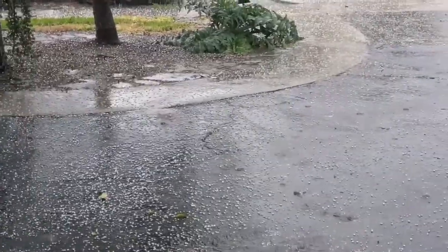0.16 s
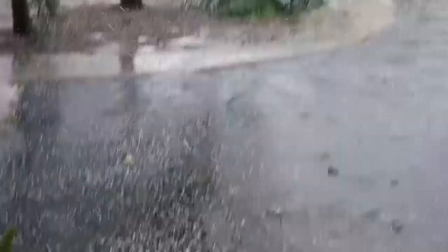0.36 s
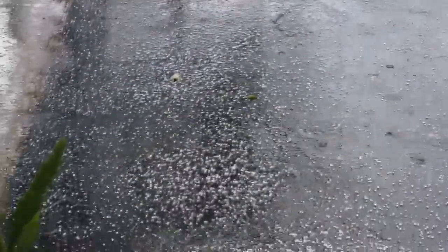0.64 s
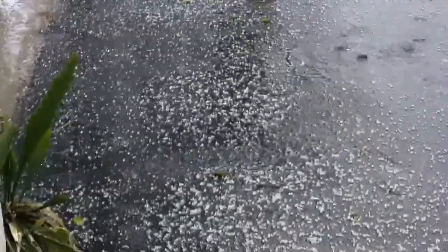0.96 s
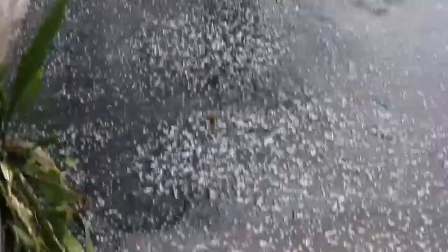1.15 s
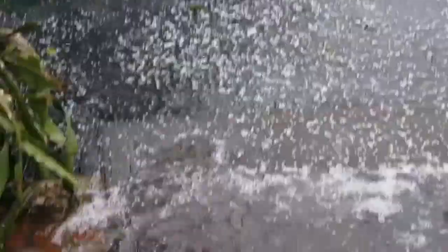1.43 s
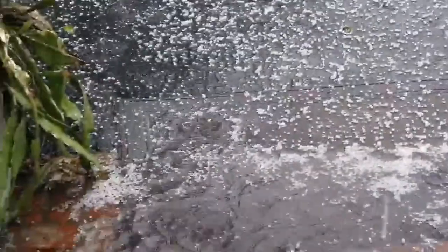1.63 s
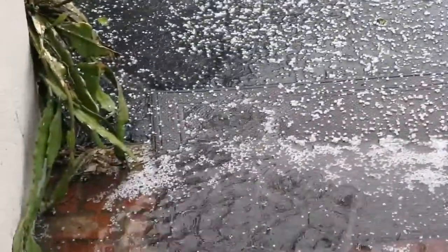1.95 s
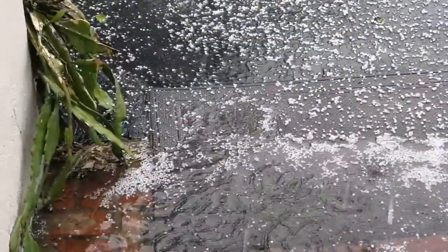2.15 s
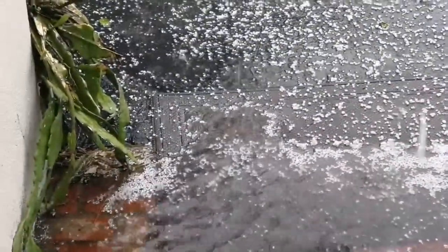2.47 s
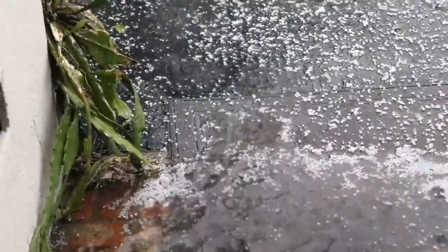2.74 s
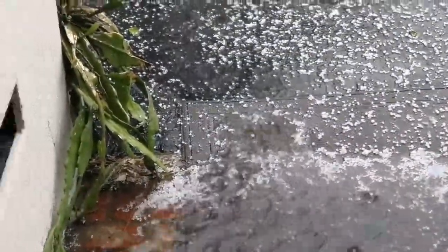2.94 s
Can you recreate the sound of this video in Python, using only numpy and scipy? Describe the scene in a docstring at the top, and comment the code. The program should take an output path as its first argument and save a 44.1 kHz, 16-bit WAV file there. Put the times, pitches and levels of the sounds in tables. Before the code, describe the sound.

Small hail with heavy rain on wet pavement, heard in stereo from a doorway: steady hiss, crisp nearby ticks, puddle plips and eave splashes; a low boom fades at the start, and one stone pings metal late.

```python
"""Hail and heavy rain on wet pavement

Small hail and heavy rain, heard in stereo from a doorway. Far drops fuse into a hiss of filtered noise;
near stones tick as short damped modes, sharp on the left and blurred by the wall on the right.
Water splashes from the eave as grainy noise bursts, and drops leave ringing bubbles in puddles.
One stone rings a piece of metal, and a low boom of damped sines dies away over a soft noise rumble."""
import sys
import numpy as np
from scipy import signal
from scipy.fft import rfft, irfft, next_fast_len
from scipy.io import wavfile
from scipy.ndimage import uniform_filter1d, map_coordinates

SR = 44100
rng = np.random.default_rng(int(sys.argv[2]) if len(sys.argv) > 2 else 0)


def pcm_store(signal):
    """Save signal as 16-bit PCM."""
    levels = np.round(np.clip(np.atleast_2d(signal), -1, 1) * 32767)
    wavfile.write(sys.argv[1], SR, levels.astype(np.int16).T)


def convert_level_to_amplitude(level_db):
    """Map a level in decibels to its linear amplitude factor."""
    exponent = np.asarray(level_db, float) / 20
    return 10 ** exponent


N = 136710  # length in samples


def unit(x):
    """Normalization: a signal divided by its root mean square has rms 1."""
    return x / np.sqrt(np.mean(x ** 2) + 1e-20)


def along(points, hz):
    """Logarithmic frequency scale: (f/Hz, value) points joined by straight lines on it."""
    f, value = np.transpose(points)
    return np.interp(np.log(hz + 1), np.log(f + 1), value)


def curve(rows):
    """Envelope: (t/s, value) rows joined by straight lines, one value per sample."""
    return np.interp(np.arange(N) / SR, *np.transpose(rows))


def wobble(rate):
    """Random modulation, slow or fast: a spline through Gaussian knots, rate of them per second."""
    knots = rng.standard_normal(int(N * rate / SR) + 4)
    return map_coordinates(knots, [np.arange(N) * rate / SR])


def filtered(x, response):
    """Linear filtering: the spectrum of x is multiplied by a response of frequency."""
    size = next_fast_len(N + 8192)
    spectrum = rfft(x, size) * response(np.fft.rfftfreq(size, 1 / SR))
    return irfft(spectrum, size)[..., :N]


def rush(spectrum, patchy_db):
    """Diffuse field: stereo noise of rms 1, patchy in time and frequency, with set coherence and phase."""
    # likeness of left and right: f/Hz, correlation
    alike = [(40, .94), (85, .93), (130, .98), (215, .95), (340, .8), (430, .45), (515, .1), (700, .3),
             (1000, .6), (1250, .12), (1600, .38), (2300, .33), (2670, .03), (3360, .28), (4500, .03)]
    # phase between the ports: f/Hz, lead of the right/rad
    lead = [(400, 0), (560, -2.5), (700, -1.45), (1000, -0.6), (1200, -1), (1500, 0.57), (2000, 2.5),
            (2500, 3), (3100, 5.5)]

    cells = signal.stft(rng.standard_normal((2, N)), nperseg=512)[2]
    patches = uniform_filter1d(rng.standard_normal(cells.shape[1:]), size=8, axis=0)
    patches = uniform_filter1d(patches, size=5, axis=1)
    noise = signal.istft(cells * convert_level_to_amplitude(patchy_db * unit(patches)), nperseg=512)[1][:, :N]

    def mid_side(hz):
        # cos^2 - sin^2 of half the angle gives the wanted correlation
        angle = np.arccos(np.clip(along(alike, hz), -1, 1)) / 2
        return convert_level_to_amplitude(along(spectrum, hz)) * [np.cos(angle), np.sin(angle)]

    def phase(hz):
        return np.exp(1j * along(lead, hz) * np.array([[-.5], [.5]]))

    mid, side = filtered(noise, mid_side)
    return unit(filtered([mid + side, mid - side], phase))


def rings(s, db, hz, t60, size, rise_s=1e-5, age_s=0):
    """Free decay of resonators: damped sines, one per row, summed on the time line."""
    t = np.arange(size) / SR + age_s
    hz = np.minimum(hz, SR * .45)
    decay = convert_level_to_amplitude(db[:, None] - 60 * t / t60[:, None])
    wave = decay * np.sin(2 * np.pi * hz[:, None] * t) * (1 - np.exp(-t / rise_s))
    position = (np.round(s * SR)[:, None] + np.arange(size)).astype(int)
    return np.bincount(position.ravel(), wave.ravel(), N + size)[:N]


def placed(x, direct_db, wall_db):
    """Diffuse reflection: direct sound plus a decaying noise tail of the wall, unlike at the two ports."""
    # decay of the wall's answer: f/Hz, t60/s
    wall = [(500, .15), (4000, 0.19), (14000, 0.066)]
    hz, t, cells = signal.stft(rng.standard_normal((2, SR // 4)), SR, nperseg=128)
    decay = convert_level_to_amplitude(-60 * t / along(wall, hz)[:, None])
    tail = signal.istft(cells * decay, SR, nperseg=128)[1]
    tail = tail / np.linalg.norm(tail, axis=1, keepdims=True)
    reflected = signal.fftconvolve(x[None], tail, axes=1)[:, :N]
    return convert_level_to_amplitude(direct_db) * x + convert_level_to_amplitude(wall_db) * reflected


def rain():
    """Superposition of countless far drops: a patchy noise hiss that swells, its treble flickering more."""
    # strength of the shower before its swells: t/s, level/dB
    shower = [(0.0, -32.5), (0.29, -31.5), (1.4, -32), (1.86, -32.5), (2.37, -32), (2.77, -33),
              (3.1, -32.5)]
    # relative spectrum of far rain: f/Hz, density/dB per Hz
    hiss_spectrum = [(240, -38), (400, -12.5), (511, -9.5), (663, -7.5), (1080, -3.5), (1300, -6),
                     (1610, -4), (2260, -5), (3320, -2.5), (4950, -2), (7960, -8), (15600, -21)]
    # share of the hiss that flickers: f/Hz, level/dB
    treble = [(3000, -11), (8000, -3.5), (15600, -7)]

    swell_db = .15 * wobble(7) + .4 * wobble(30)
    hiss = rush(hiss_spectrum, patchy_db=1.16)
    flicker = convert_level_to_amplitude(0.75 * (wobble(30) + wobble(70) + wobble(200))) - 1
    bright = filtered(hiss, lambda hz: convert_level_to_amplitude(along(treble, hz)))
    return convert_level_to_amplitude(curve(shower) + swell_db) * (hiss + flicker * bright)


def boom():
    """Modal decay: a few low damped sines, already sounding at the start, die away."""
    # modes of the boom: f/Hz, relative level/dB, t60/s
    modes = [(125, -6, 0.18), (140.4, 3, 0.23), (214, -3, 0.24), (356, -8.5, 0.15), (502, -26, .1)]
    hz, db, t60 = np.transpose(modes)
    return rings(0 * hz, -26.5 + db, hz, t60, size=16000, age_s=0.0018)


def rumble():
    """Band-limited noise: a soft low rumble and, in narrow resonance bands, a wavering hum."""
    # level of the rumble: t/s, level/dB
    rumble_level = [(0.05, -44), (0.09, -47), (0.12, -41.5), (.22, -44.5), (.26, -41.5), (.3, -41.5),
                    (.5, -45), (.62, -46), (0.95, -47), (2.12, -47.5), (2.51, -46), (2.54, -44),
                    (2.98, -50), (3.1, -45)]
    # relative spectrum of the rumble: f/Hz, density/dB per Hz
    rumble_spectrum = [(50, -39), (85, -20.5), (124, -1.5), (140, -2), (188, 0), (242, -7.5), (297, -2.5),
                       (520, -14), (680, -47), (1140, -120)]
    # hum bands, before the level moves them: f/Hz, level/dB, width at half amplitude/Hz
    hum_bands = [(140, -56.5, 10.6), (200, -66, 30), (356, -63.5, 49)]

    hum = 0
    for hz, db, width in hum_bands:
        band = filtered(rng.standard_normal(N), lambda f: 1 / (1 + ((f - hz) / width * 2) ** 2))
        hum = hum + convert_level_to_amplitude(db) * unit(band)
    level_db = curve(rumble_level)
    noise = convert_level_to_amplitude(level_db) * rush(rumble_spectrum, patchy_db=0.5)
    return noise + convert_level_to_amplitude(level_db - level_db.mean()) * hum


def air():
    """Flow noise: air stirring at the ports gives very low noise of changing level."""
    # level of the stirring air: t/s, level/dB
    air_level = [(0.05, -55), (0.2, -51), (1.11, -55), (2.04, -55.5), (2.07, -45), (2.2, -57), (3.1, -56)]
    # relative spectrum of the air noise: f/Hz, density/dB per Hz
    air_spectrum = [(7.1, -30), (12, -3), (38, 1.5), (81, -7.5), (95, -3.5), (120, -33), (210, -120)]
    return convert_level_to_amplitude(curve(air_level)) * rush(air_spectrum, patchy_db=0.1)


def hail():
    """Impact excitation: stones tick in short modes; loud ones shatter into fragments, over a patter."""
    # loud near stones, before modes and paths: t/s, level/dB, f/Hz
    stones = [(0.0961, -20, 3600), (0.2995, -20, 7500), (0.4249, -17, 5200), (0.4375, -22, 10700),
              (0.5473, -19, 10700), (0.6592, -20, 6500), (0.8195, -21, 9000), (1.0716, -21, 9000),
              (1.0842, -20, 9000), (1.2099, -21, 12900), (1.4649, -18, 9000), (1.5142, -20, 10700),
              (1.5588, -21, 7500), (1.6161, -21, 3600), (1.6563, -19, 12900), (1.9625, -18, 6200),
              (2.0598, -20, 6200), (2.3457, -24, 12900), (2.3633, -20, 9000), (2.4147, -16, 9000),
              (2.4845, -21, 10700), (2.5188, -21, 5200), (2.5285, -19, 4600), (2.5398, -18, 3800),
              (2.6791, -18, 12900), (2.733, -21, 10700), (2.8288, -19, 6200), (2.8573, -19, 12900),
              (2.9803, -15, 5000), (3.0388, -23, 6200)]
    # modes of a stone: frequency ratio, relative level/dB
    modes = [(.55, -9), (.75, -5), (1, -2), (1.25, -9)]
    # gains of the direct path, then of the wall path, to left and right: level/dB
    direct_db = [
        [3],
        [-15],
    ]
    wall_db = [
        [-10],
        [-8],
    ]
    cycles, rise_s = 22, .00012  # cycles of each mode in its t60; rise time

    # patter in flurries: a Poisson process of 900 stones per second, with an exponential spread of levels
    u = rng.random((3000, 2))
    small_s = np.cumsum(-np.log(u[:, 0])) / 900
    small_hz = 8150 * 2 ** (0.555 * rng.standard_normal(len(small_s)))  # spread in octaves
    flurry_db = 2.2 * wobble(25)[np.minimum(small_s * SR, N - 1).astype(int)]
    small_db = -41 + flurry_db + np.minimum(-3 * np.log(u[:, 1]), 12)
    small = np.c_[small_s, small_db, small_hz][small_s < N / SR]

    # fragments: six small ticks within 5.5 ms of each loud stone
    loud_s, loud_db, loud_hz = np.repeat(stones, repeats=6, axis=0).T
    v = rng.random((len(loud_s), 3))
    fragment_db = loud_db - 9.5 - 8 * v[:, 1]
    fragments = np.c_[loud_s + 0.0055 * v[:, 0], fragment_db, loud_hz * 2 ** (.4 - v[:, 2])]

    s, db, hz = np.vstack([stones, fragments, small]).T
    tick = 0
    for i, (ratio, mode_db) in enumerate(modes):
        mode_hz = hz * ratio
        mode = rings(s, db + mode_db, mode_hz, cycles / mode_hz, size=260, rise_s=rise_s)
        tick = tick + (-1) ** i * mode  # neighbouring modes in opposite phase
    return placed(tick, direct_db, wall_db)


def bubbles():
    """Bubble resonance: drops into puddles leave tiny ringing bubbles, each side its own."""
    def side():
        u = rng.random((2000, 2))
        hz = 3003 * 2 ** (0.793 * rng.standard_normal(2000))  # spread in octaves
        db = -45 + np.minimum(-5 * np.log(u[:, 1]), 12)
        t60 = 35.4 / hz  # a fixed number of cycles
        return rings(u[:, 0] * (N - 1) / SR, db, hz, t60, size=700, rise_s=0.00063)

    return np.array([side(), side()])


def splashes():
    """Burst noise: water from the eave lands and scatters; grainy body and fizz rise fast and decay."""
    # splashes, levels before rise and grain: t/s, body level/dB, fizz level/dB
    gushes = [(.295, -32, -55), (.648, -43, -56), (.8, -37, -50), (1.205, -32, -39), (1.262, -33, -52),
              (1.388, -31.5, -51), (1.53, -29, -51), (2.035, -32, -48), (2.215, -30.5, -50),
              (2.518, -34.5, -52), (2.538, -36, -50), (2.658, -30, -39), (2.85, -31, -41),
              (2.978, -29, -45), (3.03, -35, -47)]
    # relative spectrum of the body: f/Hz, level/dB
    body_spectrum = [(1500, -31), (2600, -5.5), (3500, -1.5), (5500, 0), (8000, -5.5), (14000, -20)]
    # relative spectrum of the fine spray: f/Hz, level/dB
    fizz_spectrum = [(5000, -30), (8500, -10), (12000, 3), (15500, -1)]

    s, body_db, fizz_db = np.transpose(gushes)[:, :, None]
    t = np.maximum(np.arange(N) / SR - s, 0)
    rise = 1 - np.exp(-t / 0.00087)

    def part(db, t60, spectrum):
        envelope = np.sum(convert_level_to_amplitude(db - 60 * t / t60) * rise, axis=0)
        grain = convert_level_to_amplitude(2.5 * np.array([wobble(500), wobble(500)])) * rng.standard_normal((2, N))
        return envelope * unit(filtered(grain, lambda hz: convert_level_to_amplitude(along(spectrum, hz))))

    return part(body_db, 0.18, body_spectrum) + part(fizz_db, .15, fizz_spectrum)


def plips():
    """Bubble resonance, lightly damped: a few louder bubbles ring longer and more clearly."""
    # clearest bubbles, before rise and paths: t/s, level/dB, f/Hz
    clear = [(.66, -26, 2690), (.672, -23.5, 3050), (.925, -21, 3490), (1.02, -33.5, 1144),
             (1.207, -22, 3810), (1.556, -24, 3500)]
    s, db, hz = np.transpose(clear)
    ringing = rings(s, db, hz, 90 / hz, size=3000, rise_s=0.0024)  # t60 of 90 cycles
    return placed(ringing, [[-4], [0]], [[-8], [-8]])


def ping():
    """Modal excitation: each contact of a rattling stone rings the metal anew, in its own mix of modes."""
    # contacts, before modes and panning: t/s, level/dB, left minus right/dB
    contacts = [(2.3762, -14.5, 11), (2.3803, -16, 10), (2.3832, -22, -8), (2.3895, -25, -5),
                (2.3985, -25, -2), (2.4045, -24.5, -2), (2.4175, -27, -5), (2.432, -28, -2)]
    # modes of the metal: f/Hz, relative level/dB, t60/s
    modes = [(3050, -16.5, .03), (3680, -14, 0.027), (4035, 0.5, 0.024), (4280, -5.5, 0.022),
             (4550, -9, 0.03), (4740, -11, 0.034)]
    # gains of the wall path to left and right: level/dB
    ping_wall_db = [
        [-12],
        [-7.5],
    ]

    hz, db, t60 = np.transpose(modes)
    hits = []
    for s, hit_db, _ in contacts:
        mix_db = hit_db + db + rng.normal(0, 2.5, len(hz))
        hits.append(rings(s + 0 * hz, mix_db, hz, t60, size=3000, rise_s=0.00077))
    pan_db = np.transpose(contacts)[2]
    direct = convert_level_to_amplitude([pan_db / 2, -pan_db / 2]) @ np.array(hits)
    # the wall answers the first contact; its direct path here is all but silent
    return direct + placed(hits[0], -120, ping_wall_db)


def scene():
    """Linear superposition of all sources."""
    low = boom() + rumble() + air()
    return rain() + low + hail() + bubbles() + splashes() + plips() + ping()


def band_limit(x):
    """A steep low-pass at the top of the band."""
    return signal.sosfilt(signal.butter(12, 15770, fs=SR, output="sos"), x)


def record(dry):
    """Frequency response: the two microphone ports colour the sound unlike each other."""
    # difference of the ports: f/Hz, left minus right/dB
    lean = [(100, 0), (200, -.4), (400, -3.5), (700, -1), (950, 0.5), (1200, -2.5), (2400, -2.5),
            (4500, -3), (7000, -0.5), (10000, 2.5), (15000, 6)]
    mix = filtered(dry, lambda hz: convert_level_to_amplitude(along(lean, hz) * np.array([[.5], [-.5]])))
    return band_limit(mix)


dry = scene()
out = record(dry)
pcm_store(out)
```